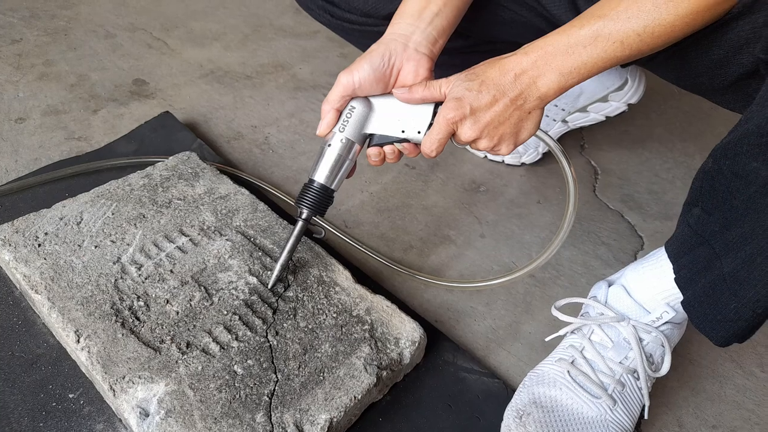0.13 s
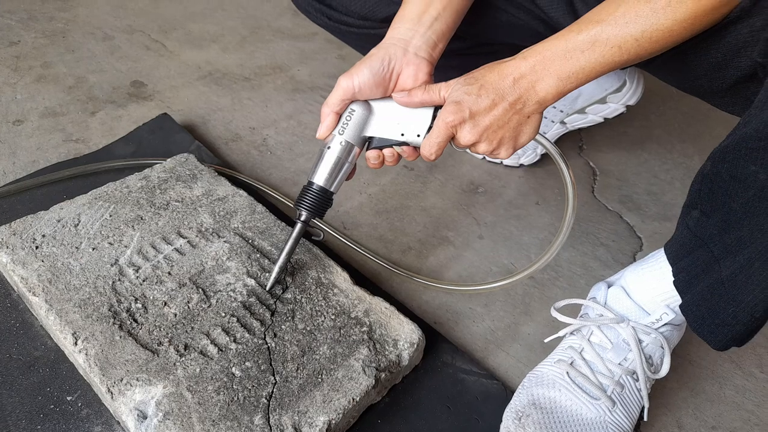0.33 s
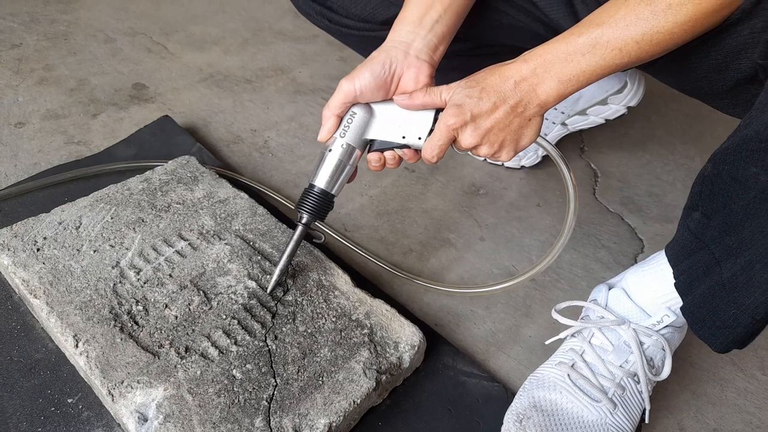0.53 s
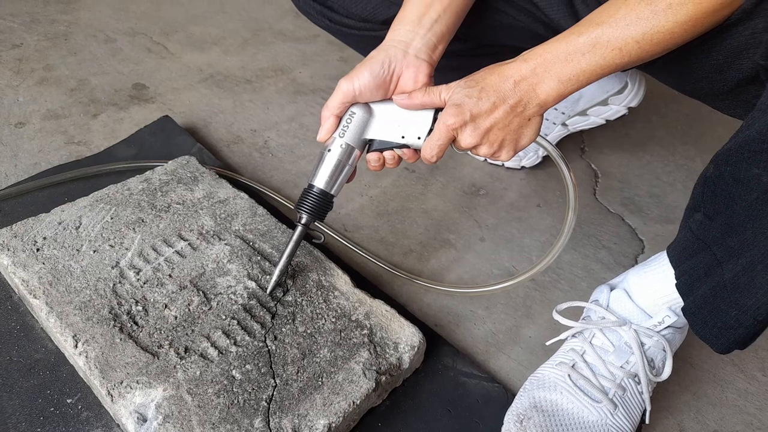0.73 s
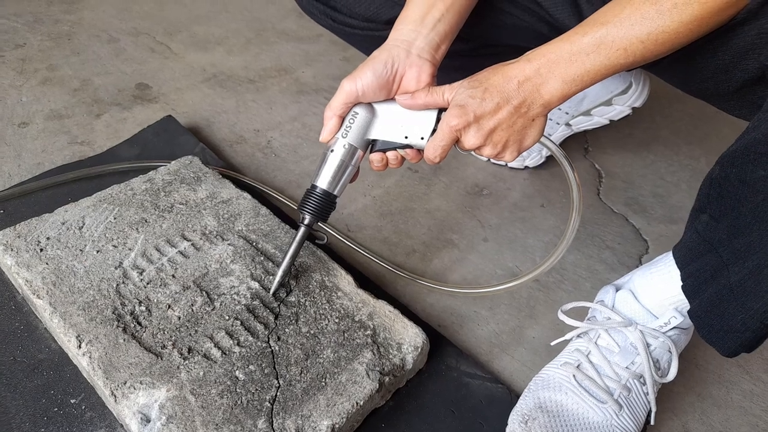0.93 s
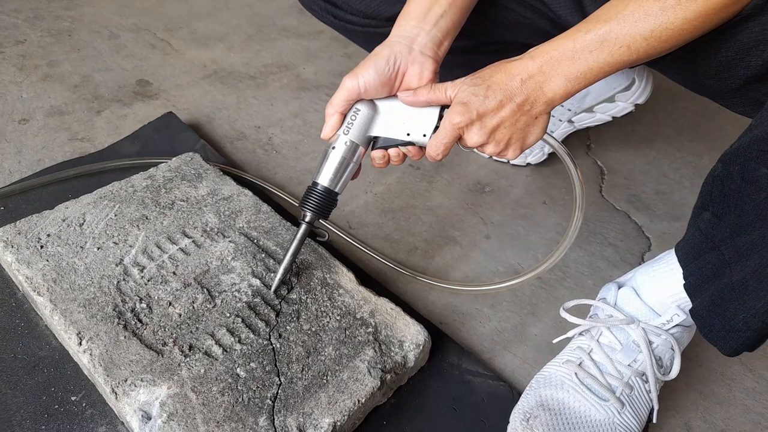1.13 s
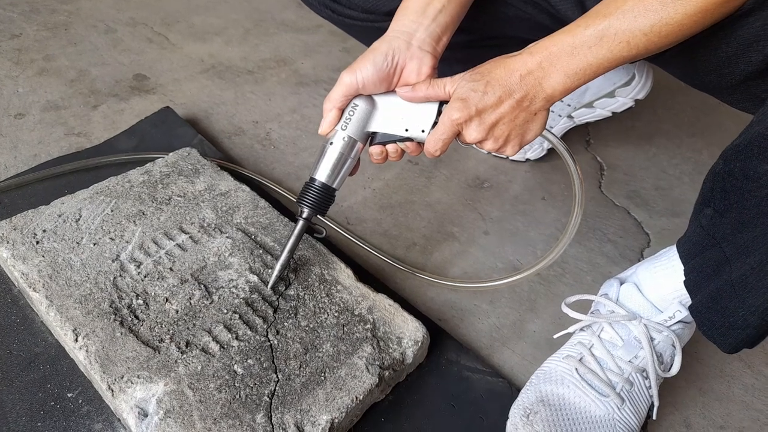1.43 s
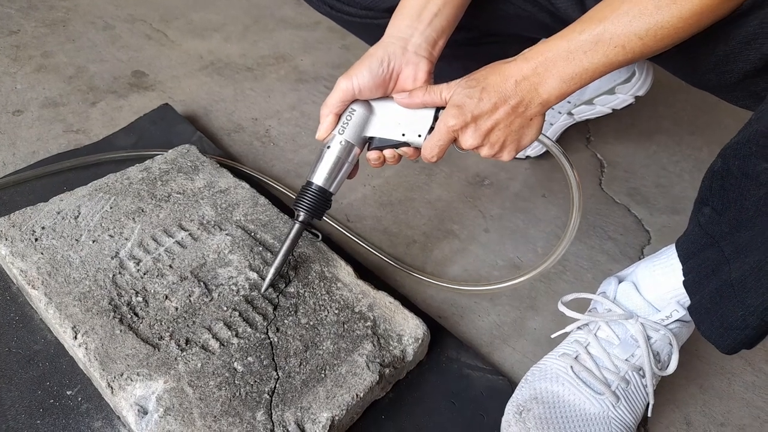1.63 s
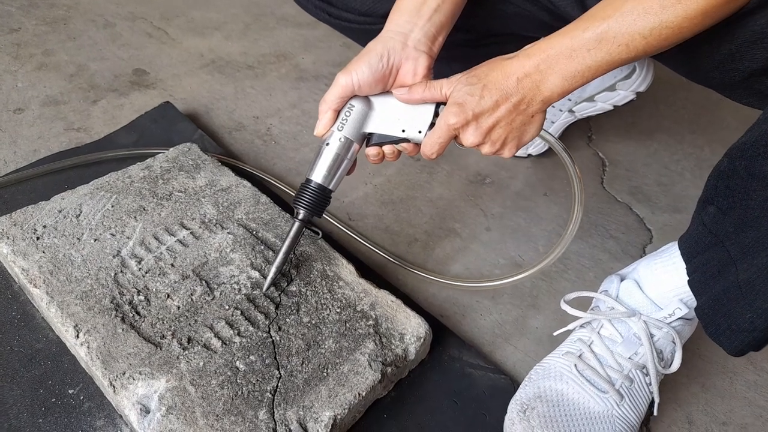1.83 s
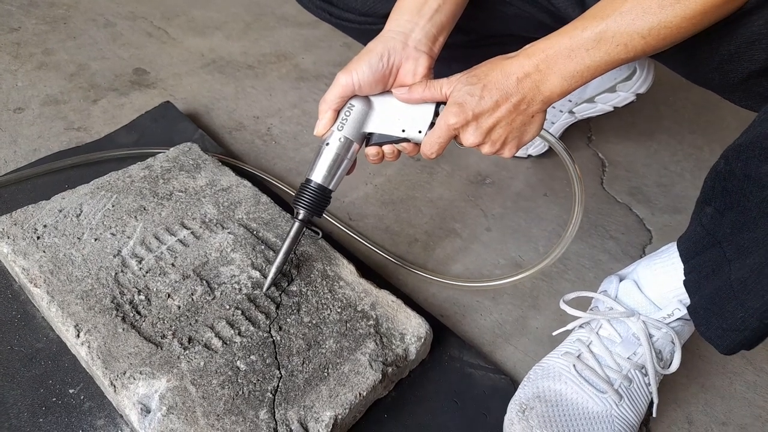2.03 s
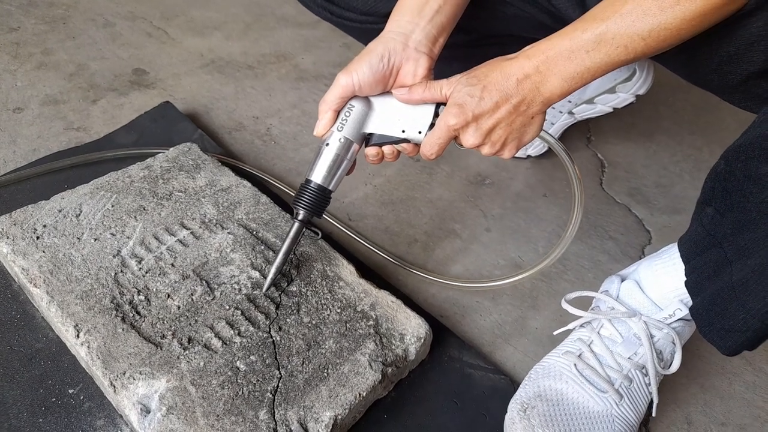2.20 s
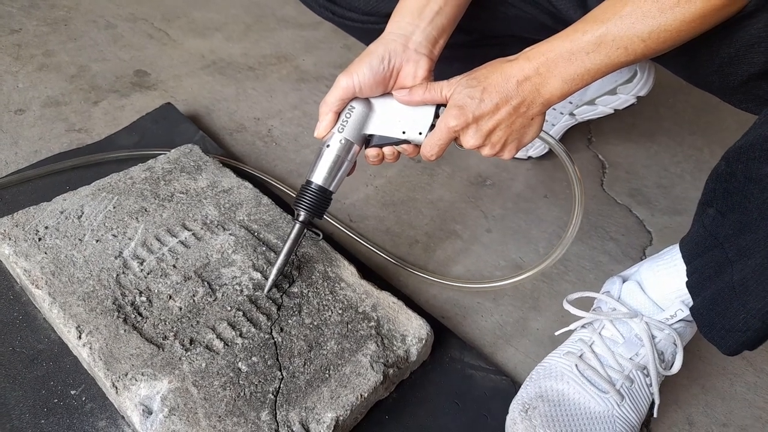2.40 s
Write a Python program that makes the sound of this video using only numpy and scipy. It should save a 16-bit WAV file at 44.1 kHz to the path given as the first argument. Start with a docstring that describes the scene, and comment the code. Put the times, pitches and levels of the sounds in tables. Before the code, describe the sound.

Rapid air hammer on a concrete slab, nearly thirty blows a second, metallic and gritty, starting after a brief motor drone and a valve burst; close stereo microphone, short indoor reflections, hammering to the end.

```python
"""A compressor drones in a workshop; then a valve spurts air and a small pneumatic hammer chisels concrete.
The drone is a wavering hum with faint tones over coloured noise. The piston strikes about 29 times a second:
each cycle is a puff of air (a resonance), a bright crack and crushed grit (noise bursts), a slab knock and
a chisel ring (decaying modes), then a swell of exhaust hiss. Echoes and a short diffuse tail form the room."""
import sys
import numpy as np
from scipy import signal
from scipy.fft import rfft, irfft
from scipy.io import wavfile

SR = 44100
rng = np.random.default_rng(int(sys.argv[2]) if len(sys.argv) > 2 else 0)


def materialize(psi):
    """Save the field psi as 16-bit PCM at rate SR to the path in sys.argv[1].

    A 1-D psi becomes a single channel; in a 2-D psi each row is a channel.
    """
    bounded = np.clip(np.atleast_2d(psi).T, -1, 1)
    quanta = np.round(bounded * 32767).astype(np.int16)
    wavfile.write(sys.argv[1], SR, quanta)


N = 112896
TIME = np.arange(N) / SR
RIGHT_LAG_S = 0.00028  # the tool is heard on the left first

# How firmly the chisel bites, interpolated between rows. Each row: time in seconds, then the relative
# levels of crack, chisel ring and slab knock in dB.
BITE = [(0.456, 3.2, -9, -4), (0.559, -2, -0.3, -4), (0.663, 0.5, 0.1, 0), (0.733, 0, 1, -3.1),
        (1.044, -0.4, -0.3, 0.3), (1.218, 2.5, 2.5, 2), (1.323, 0.3, 0.2, 1.7), (1.533, 2.5, 1.5, -1.9),
        (1.568, 0.5, -40, -12), (1.607, -0.2, -5.5, -1.5), (1.642, -2, -6, -3), (1.716, 1.5, -4.5, -3.8),
        (1.801, -1.4, -6.5, -7), (1.846, -2, -3.7, 0), (1.951, -3, -4, -1.5), (2.054, -1.7, -3.5, 1.5),
        (2.088, -5.6, -4, -3), (2.122, 2, 0.5, 2.5), (2.295, -4, -3.5, -3.5), (2.4, -0.6, -1, -0.3),
        (2.469, -2.5, -1.4, -0.7), (2.536, 1.5, 1, 3)]


def from_db(db):
    """Level as a logarithm: 20 dB is a factor of ten in amplitude."""
    return 10 ** (np.asarray(db) / 20)


def rms_one(x):
    """Normalise the mean power, so that a later gain sets the rms level."""
    return x / np.sqrt(np.mean(x ** 2) + 1e-20)


def curve(rows, s):
    """Linear interpolation of each column of a table at the times s."""
    knots, *columns = np.transpose(rows)
    return [np.interp(s, knots, column) for column in columns]


def pan(db):
    """Interaural level difference: left and right gains, positive dB favouring the left."""
    return from_db(np.array([[.5], [-.5]]) * db)


def delay(x, s):
    """Propagation delay: read a signal s seconds late."""
    return np.interp(TIME - s, TIME, x, left=0)


def drift(rate):
    """Band-limited chance: random values, rate per second, joined by lines; rms 1."""
    return rms_one(np.interp(TIME * rate, np.arange(N), rng.standard_normal(N)))


def noise(spectrum):
    """Spectral shaping of partly coherent stereo noise, most alike near 250 Hz; rms 1."""
    # Each row: frequency in Hz, correlation of left and right.
    likeness = [(40, 0.27), (100, 0.38), (250, 0.91), (600, 0.63), (1500, 0.1), (4000, 0.035),
                (12000, 0.067)]
    log_hz = np.log(np.maximum(np.arange(N // 2 + 1) * SR / N, 1))

    def over_log_hz(rows):
        hz, value = np.transpose(rows)
        return np.interp(log_hz, np.log(hz), value)

    colour = from_db(over_log_hz(spectrum))
    alike = over_log_hz(likeness)
    mid, side = rfft(rng.standard_normal((2, N)))
    both_sides = np.sqrt(1 + alike) * mid + np.sqrt(1 - alike) * side * [[1], [-1]]
    return rms_one(irfft(colour * both_sides, N))


def clicks(s, db):
    """Impulsive excitation: one single-sample click at each time."""
    return np.bincount(np.round(s * SR).astype(int), from_db(db), N)[:N] + 1e-18


def soften(x, s):
    """First-order relaxation: one-pole smoothing with a time constant of s seconds."""
    r = np.exp(-1 / (s * SR))
    return signal.lfilter([1 - r], [1, -r], x)


def bursts(s, db, rise_s, t60):
    """Exponential decay: an envelope rises at each time and loses 60 dB in t60 seconds."""
    decays = signal.lfilter([1], [1, -from_db(-60 / (t60 * SR))], clicks(s, db))
    return soften(decays, rise_s)


def ring(x, hz, t60):
    """Damped resonance: a unit click sets a sine of initial height 1 ringing."""
    r, w = from_db(-60 / (t60 * SR)), 2 * np.pi * hz / SR
    return signal.lfilter([0, np.sin(w)], [1, -2 * r * np.cos(w), r * r], x)


def struck(modes, s, db):
    """Modal superposition: each blow rings every mode, at a strength and tuning of its own; rms 1."""
    mode_spread_db = 1.5
    contact_detune = .0033  # spread, as a share of frequency: the contact shifts the modes at each blow
    hz, level_db, t60, side_db = np.transpose(modes)
    age = np.arange(SR // 5) / SR
    polarity = (-1) ** np.arange(len(hz))[:, None]
    decay = from_db(-60 * age / t60[:, None]) * polarity
    out = np.zeros((2, N + len(age)))
    for start, force_db in zip(np.round(s * SR).astype(int), db):
        strength, tuning = rng.standard_normal((2, len(hz)))
        rings = decay * np.sin(2 * np.pi * np.outer(hz * (1 + contact_detune * tuning), age))
        gains = pan(side_db) * from_db(force_db + level_db + mode_spread_db * strength)
        out[:, start:start + len(age)] += gains @ rings
    left, right = out[:, :N]
    return rms_one(np.array([left, delay(right, RIGHT_LAG_S)]))


def direct(x):
    """Partial coherence: some of the left signal also arrives on the right, a moment later."""
    share = 0.46  # amplitude of the common part
    right = share * delay(x[0], RIGHT_LAG_S) + np.sqrt(1 - share ** 2) * x[1]
    return np.array([x[0], right])


def blow_times():
    """Periodic excitation: each stretch of hammering is filled with evenly spaced blows."""
    # The piston slows briefly near 1.7 s. Each row: first blow in seconds, nominal rate in blows per second.
    runs = [(.4561, 29.2), (.5933, 28.5), (.6985, 28.9), (1.1137, 28.6), (1.568, 25.6), (1.6071, 28.3),
            (1.6778, 26.2), (1.7159, 23.0), (1.8462, 29.1), (2.19, 28.5), (2.3657, 29.3)]
    last_run_ends_s = 2.5705
    ends = [s for s, _ in runs[1:]] + [last_run_ends_s]
    stretches = []
    for (start, rate), end in zip(runs, ends):
        count = round((end - start) * rate)
        stretches.append(np.linspace(start, end, count, endpoint=False))
    return np.concatenate(stretches)


def compressor():
    """Tonal and broadband machine noise: a wavering motor hum and faint tones over a rumble."""
    starts_s, side_db = .105, 1
    hum_hz, rumble_db = 118.3, -33
    # Hum, before a fixed cut of 1.5 dB. Each row: time in seconds, level in dB.
    hum_level = [(.105, -24), (.16, -25.5), (.21, -31.5), (.3, -25), (.35, -24), (.38, -33), (.48, -27.5),
                 (.6, -37.5), (1.0, -36), (1.2, -32.5), (1.27, -43), (1.36, -30), (1.44, -42.5),
                 (1.55, -27), (1.66, -39), (1.72, -30), (1.82, -43.5), (1.93, -30.5), (2.05, -50),
                 (2.54, -34.5)]
    # Thin tones, before the drone's changing level. Each row: frequency in Hz, level in dB.
    whines = [(59, -73), (721, -47), (1632, -48)]
    # Colour of the rumble. Each row: frequency in Hz, relative density in dB per Hz.
    rumble = [(25, -13), (45, -8), (62, 3), (100, -1.5), (160, -0.5), (200, -8), (330, -6.5), (430, -17.5),
              (520, -10.5), (950, -17), (1700, -13), (2200, -17.5), (2900, -19), (3800, -23), (5500, -23),
              (8500, -35), (12000, -30), (16000, -33)]
    # Gain on tones and rumble, not on the hum. Each row: time in seconds, gain in dB.
    drone_level = [(.1, 2), (.45, 3), (.65, -5), (2.56, -2.5)]
    (hum_db,), (level_db,) = curve(hum_level, TIME), curve(drone_level, TIME)

    def tone(hz, db):
        """Amplitude and phase modulation: a sine of the given rms level wavers slightly."""
        level = np.sqrt(2) * from_db(db + 0.95 * drift(20))  # waver in dB
        return level * np.sin(2 * np.pi * hz * TIME + 0.18 * drift(12))  # phase wander in radians

    rest = sum(tone(hz, db) for hz, db in whines) + from_db(rumble_db) * noise(rumble)
    onset = soften(TIME > starts_s, 0.00043)
    return onset * pan(side_db) * (tone(hum_hz, hum_db - 1.5) + from_db(level_db) * rest)


def workshop(x):
    """Room reflection: a few early echoes and a diffuse, exponentially dying tail."""
    t60_s, tail_delay_s, tail_db = 0.14, 0.0086, -9
    # Floor and walls. Each row: left delay in seconds, level in dB, right delay in seconds.
    echoes = [(.0072, -52, 0.0097), (0.014, -16, .0121), (0.0147, -18.5, .0171)]
    # Each row: frequency in Hz, relative density in dB per Hz.
    tail_colour = [(100, -2.9), (1000, 0.41), (8000, -2.5), (16000, -0.35)]
    early = sum(from_db(db) * np.array([delay(x[0], left_s), delay(x[1], right_s)])
                for left_s, db, right_s in echoes)
    tail = noise(tail_colour) * from_db(-60 * TIME / t60_s) * (TIME > tail_delay_s)
    unit_energy_tail = rms_one(tail) / np.sqrt(N)
    return early + from_db(tail_db) * signal.fftconvolve(x, unit_energy_tail, axes=1)[:, :N]


def air():
    """Turbulent jet noise: spurts as the tool lurches, and exhaust hiss that swells between the blows."""
    valve_opens_s, hiss_db, hiss_pan_db = .429, -39.5, -2.5
    exhaust_delay_s, exhaust_db, exhaust_spread_db = 0.0126, -41, 6.5
    # The tool lurches as the air comes on and when the chisel slips. Each row: time in seconds, then
    # the burst levels, before smoothing, of thump, clatter and spurt of air in dB.
    lurch_rows = [(0.428, -25, -25, -27.5), (0.4481, -18, -15, -41), (.468, -21.5, -31, -39),
                  (1.603, -27, -25.5, -34), (1.715, -21.5, -27.5, -39), (1.845, -27, -22, -31.5)]
    # Colours of thump, clatter and hiss. Each row: frequency in Hz, relative density in dB per Hz.
    thump = [(30, 12), (70, 19), (300, 21), (600, -17), (2000, -25)]
    clatter = [(150, 4), (300, -12), (420, -9.5), (650, 19), (900, -10), (1100, 2), (1800, 2), (3000, -30),
               (10000, -32)]
    hiss = [(300, 14), (420, 12), (600, 20), (1000, 10), (1800, 12.5), (3000, 1.5), (4200, -22),
            (7000, 11.5), (8300, -8), (11000, 10.5), (15500, 6.5)]
    s, *levels = np.transpose(lurch_rows)
    lurches = sum(bursts(s, db, rise_s=0.0012, t60=0.052) * noise(colour)
                  for db, colour in zip(levels, (thump, clatter, hiss)))
    vents = blow_times() + exhaust_delay_s
    vent_db = curve(BITE, vents)[0] + exhaust_spread_db * rng.uniform(-1.1, 1, len(vents))
    swell = rms_one(bursts(vents, vent_db, rise_s=0.0015, t60=0.029))
    steady = (TIME > valve_opens_s) * from_db(hiss_db)
    hiss_level = np.hypot(steady, from_db(exhaust_db) * swell)  # powers add
    return lurches + hiss_level * noise(hiss) * pan(hiss_pan_db)


def glance():
    """Modal ringing of loose steel: a thin tink as one blow glances off."""
    # Each row: frequency in Hz, relative level in dB, 60 dB decay time in seconds, left-right in dB.
    tink = [(4260, -5, 0.017, -6), (5020, -4.5, 0.029, 17), (5150, 2, 0.02, 1), (9270, 3, 0.023, 7),
            (9730, 2, 0.013, -4)]
    return from_db(-47) * struck(tink, np.array([1.5685]), [0])  # dB, seconds


def hammer():
    """Impact excitation: each blow sounds as air pulse, crack, crushed grit, slab knock and chisel ring."""
    puff_db, crack_db, grit_db, slab_db, chisel_db = -37, -33.5, -35.5, -37.5, -28  # rms, before panning
    puff_pan_db, crack_pan_db, grit_pan_db = 0.5, 3.5, 0.5
    blow_spread_db, crack_spread_db, grit_rough_db = .5, 3.5, 2
    puff_lead_s = .0048  # the air pulse that drives the piston comes just before the blow
    # Modes of chisel and barrel, then of the slab. Each row: frequency in Hz, relative level in dB,
    # 60 dB decay time in seconds, left-right difference in dB.
    chisel_modes = [(1339, 1, 0.11, 4.5), (1735, -12, 0.044, 14.5), (1785, -13, 0.034, 9.5),
                    (2172, -1.5, 0.061, 8.5), (2539, 0.5, 0.086, 6.5), (2625, 0.5, 0.029, -0.5),
                    (3011, -5, 0.078, 6), (3405, -17.5, 0.12, -9.5), (4370, -24, 0.12, 13),
                    (5053, -11, 0.028, 8.5), (7160, -14, 0.01, 22), (10800, -11, 0.012, 3),
                    (11650, -8.5, 0.019, 5), (14000, -9, .015, 10)]
    slab_modes = [(81, -14.5, 0.13, 33), (173.8, -6, 0.12, -1), (203, -8.5, 0.029, 17),
                  (310.7, -9.5, 0.13, -6), (493, -0.5, 0.076, 7), (551.3, 3, 0.074, 6.5),
                  (671, -1, 0.061, 1.5), (832, -5.5, 0.087, 7)]
    # Colours of the tip's crack and of the grit crushed under it. Each row: frequency in Hz,
    # relative density in dB per Hz.
    crack_colour = [(500, -8.5), (2500, -7), (3800, -7), (7000, -10.5), (8400, -12), (10500, 2),
                    (12500, 2.5), (14000, 4.5), (15500, -1.5)]
    grit_colour = [(300, 8.5), (410, -7), (540, 13), (750, 0), (1000, 0.5), (1800, 2), (3000, -2),
                   (4000, 2), (7000, 2.5), (8400, -3), (11000, 4.5), (15500, -13.5)]

    s = blow_times()
    bite_db, ring_db, knock_db = curve(BITE, s) + blow_spread_db * rng.standard_normal(len(s))

    pulses = soften(clicks(s - puff_lead_s, knock_db), .0009)
    puff = rms_one(ring(pulses, hz=260, t60=.045))

    tip_db = bite_db + crack_spread_db * rng.uniform(-1.3, 1, len(s))
    crack = rms_one(direct(bursts(s, tip_db, rise_s=0.00005, t60=0.008) * noise(crack_colour)))

    roughness = from_db(grit_rough_db * drift(1500))
    grit = rms_one(bursts(s, bite_db, rise_s=0.00097, t60=0.029) * noise(grit_colour) * roughness)

    return (from_db(puff_db) * pan(puff_pan_db) * puff
            + from_db(crack_db) * pan(crack_pan_db) * crack
            + from_db(grit_db) * pan(grit_pan_db) * grit
            + from_db(slab_db) * struck(slab_modes, s, knock_db)
            + from_db(chisel_db) * struck(chisel_modes, s, ring_db))


def scene():
    """Linear superposition: the tool, its reflections in the room, and the compressor behind."""
    tool = hammer() + glance() + air()
    return tool + workshop(tool) + compressor()


def record(dry):
    """Band limiting: high-pass and low-pass filters cut the deep bass and the top."""
    bass_cut = signal.butter(2, 38, "high", fs=SR, output="sos")
    top_cut = signal.ellip(8, .3, 70, 15900, fs=SR, output="sos")
    return signal.sosfilt(top_cut, signal.sosfilt(bass_cut, dry))


dry = scene()
out = record(dry)
materialize(out)
```